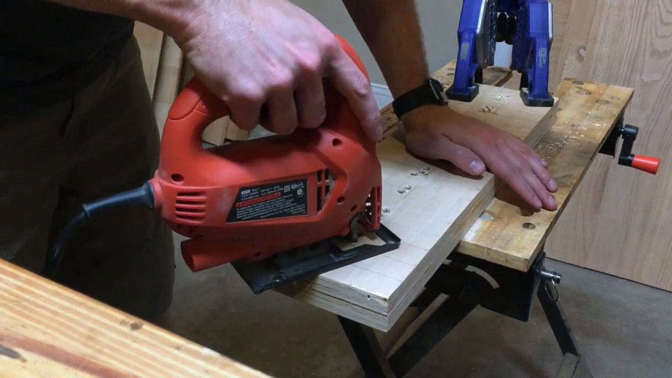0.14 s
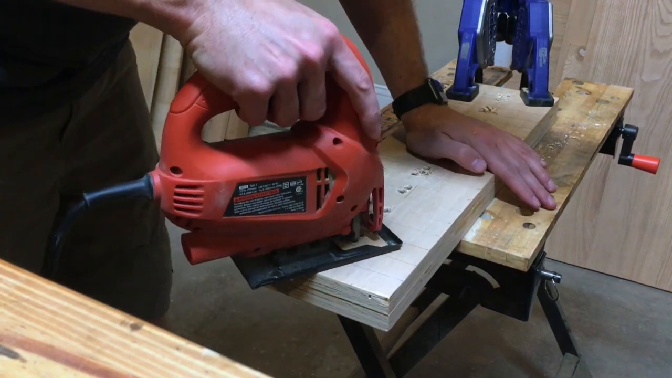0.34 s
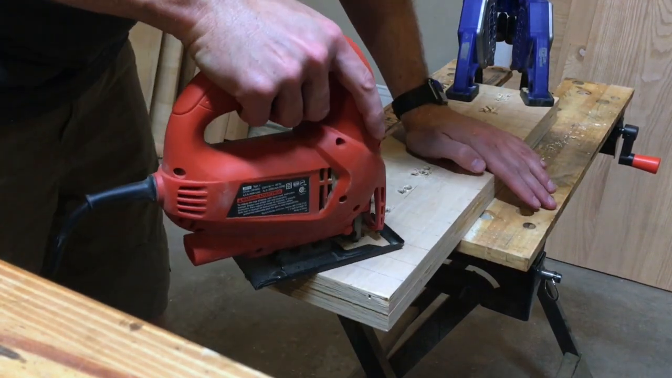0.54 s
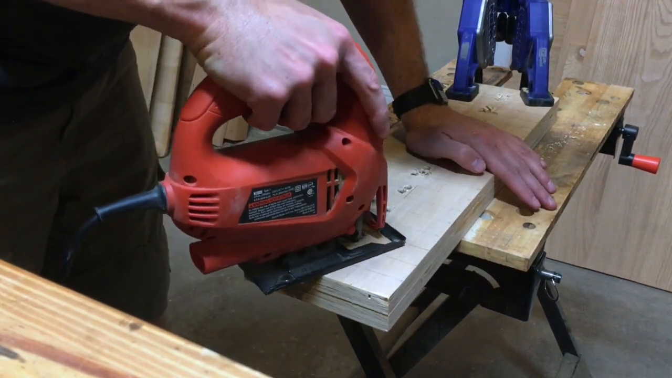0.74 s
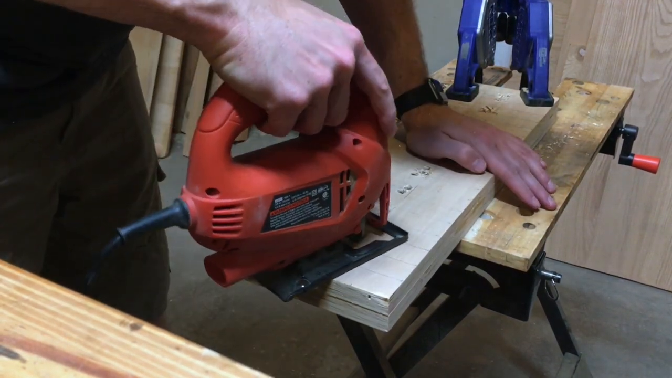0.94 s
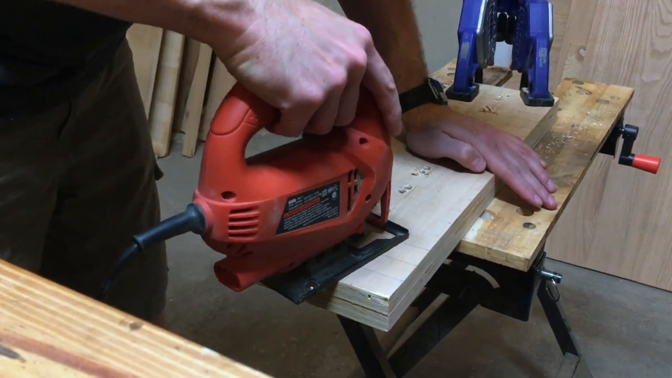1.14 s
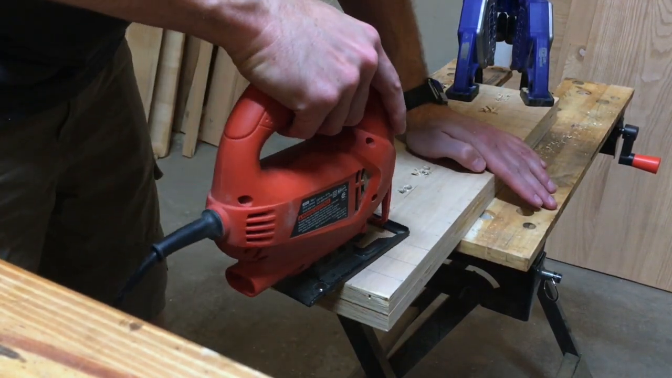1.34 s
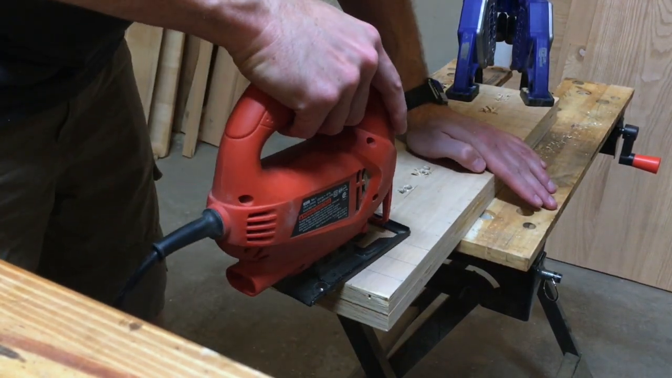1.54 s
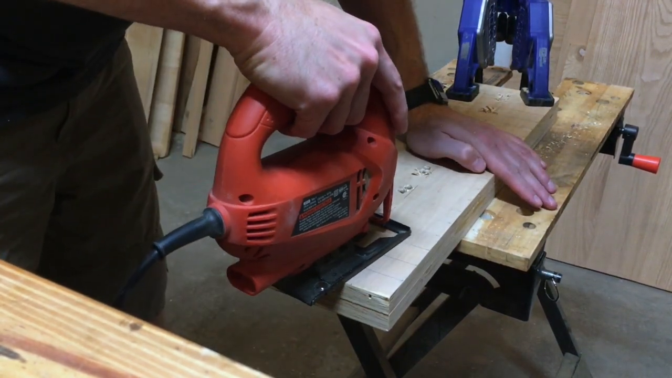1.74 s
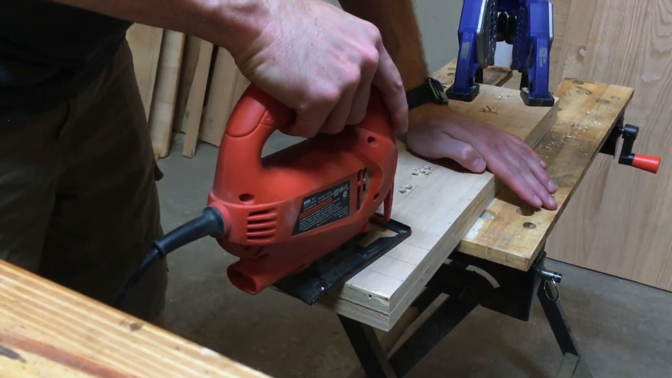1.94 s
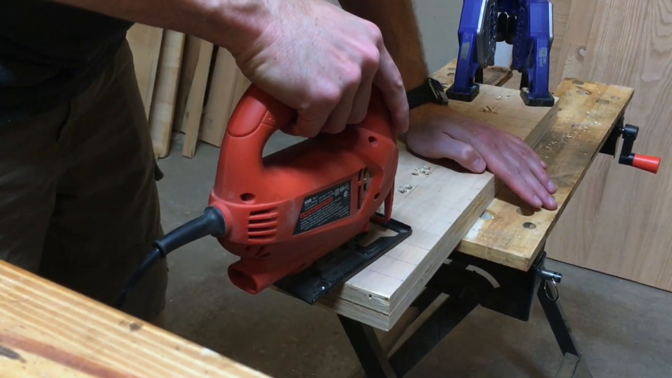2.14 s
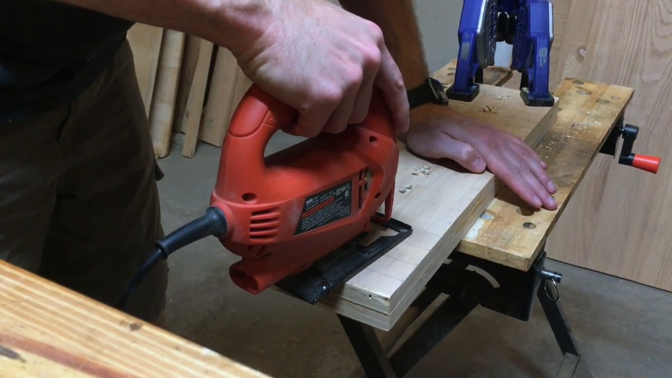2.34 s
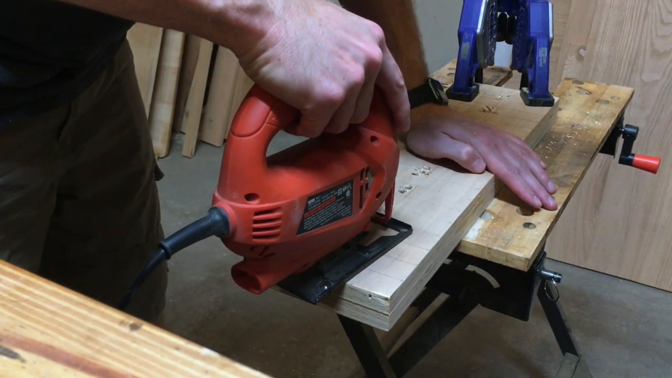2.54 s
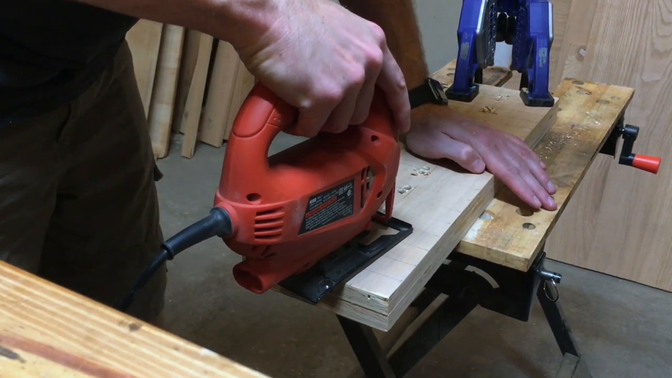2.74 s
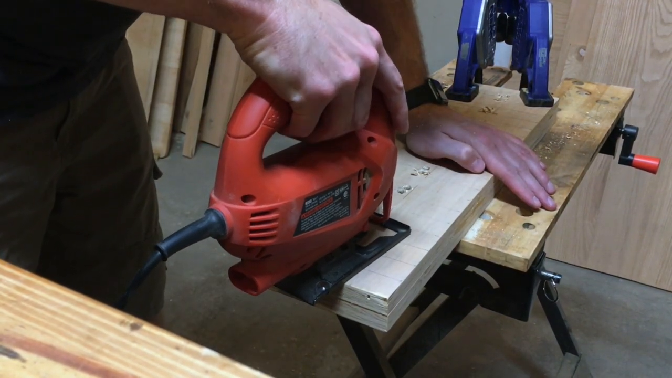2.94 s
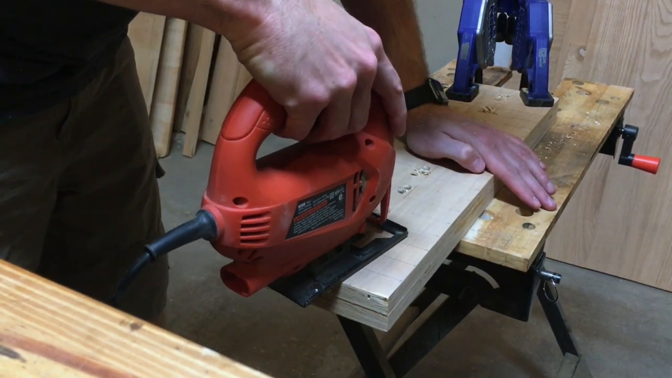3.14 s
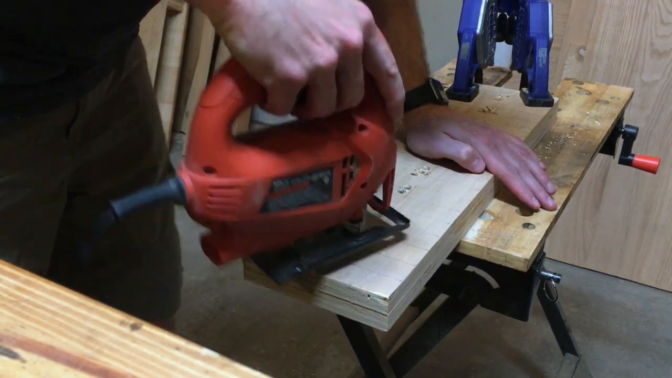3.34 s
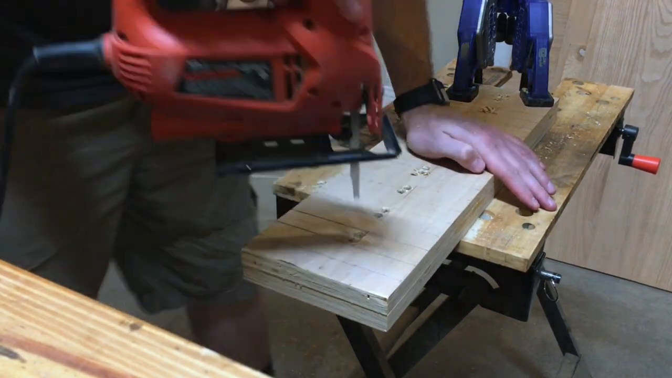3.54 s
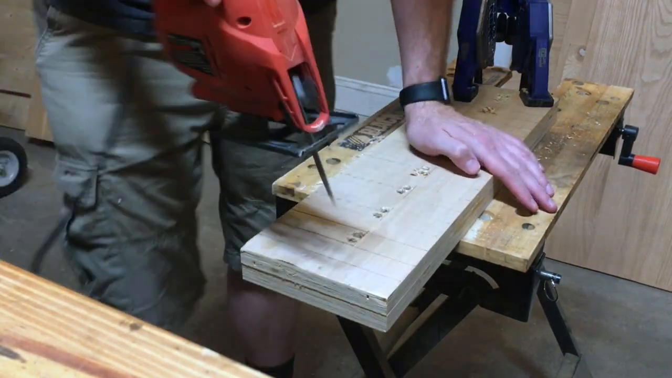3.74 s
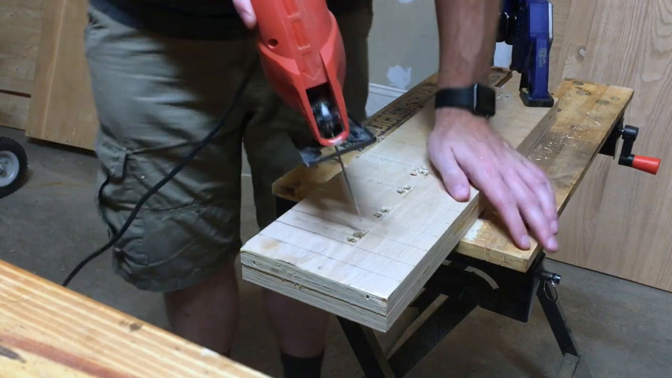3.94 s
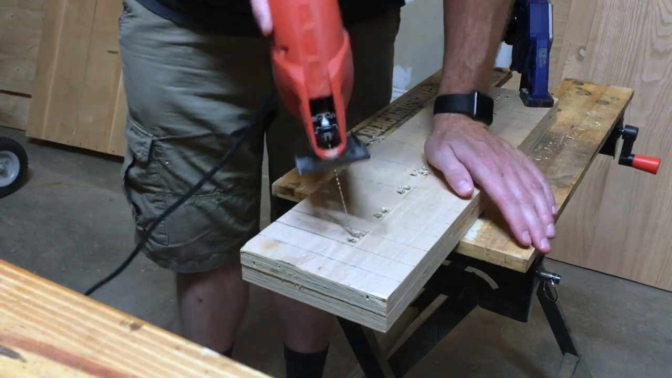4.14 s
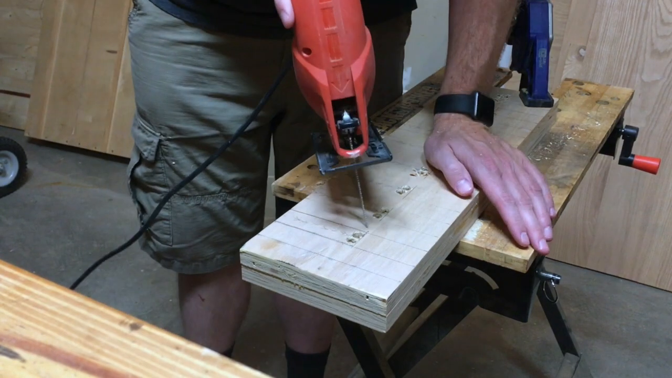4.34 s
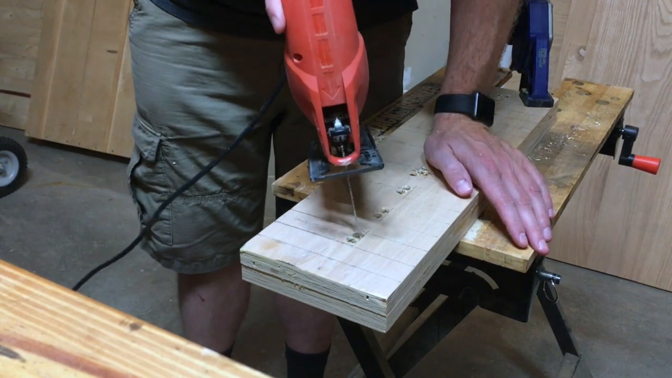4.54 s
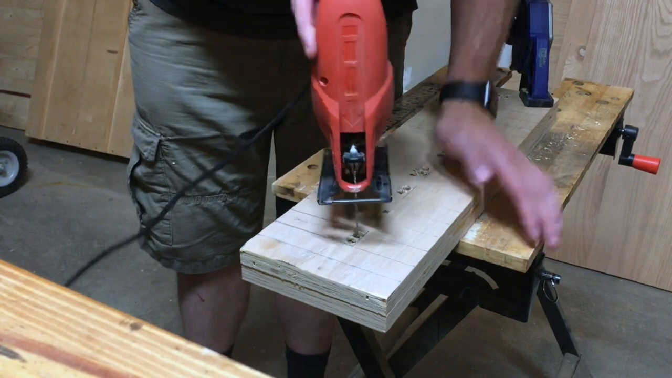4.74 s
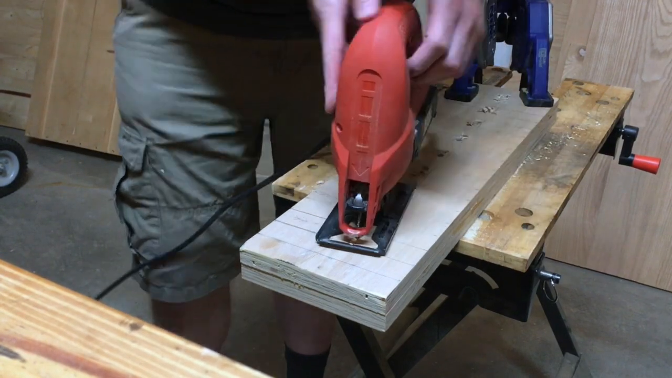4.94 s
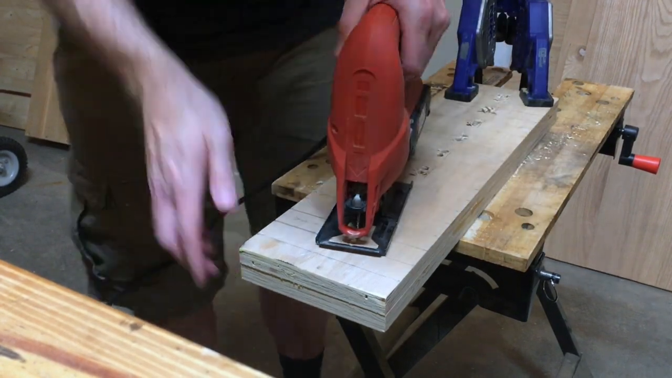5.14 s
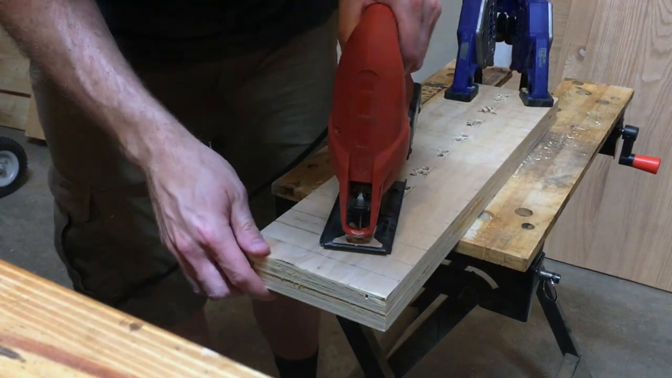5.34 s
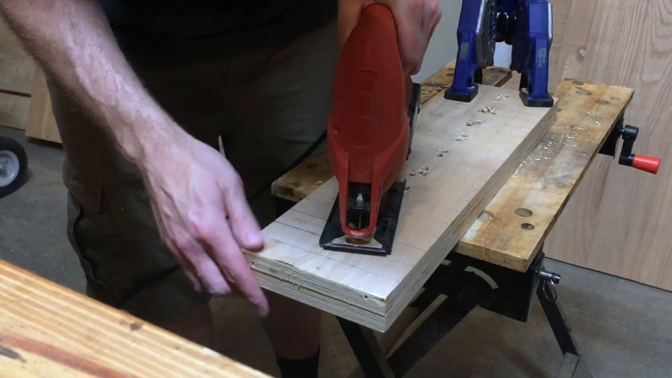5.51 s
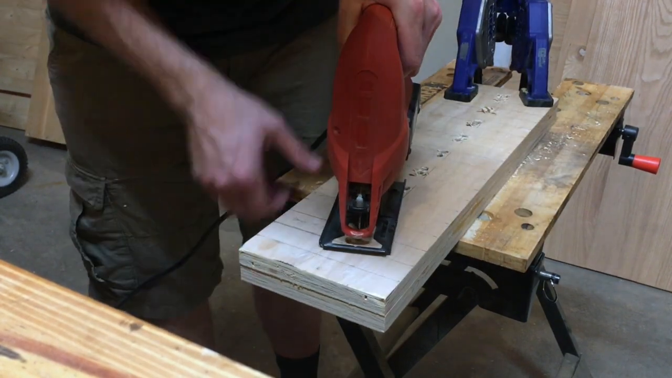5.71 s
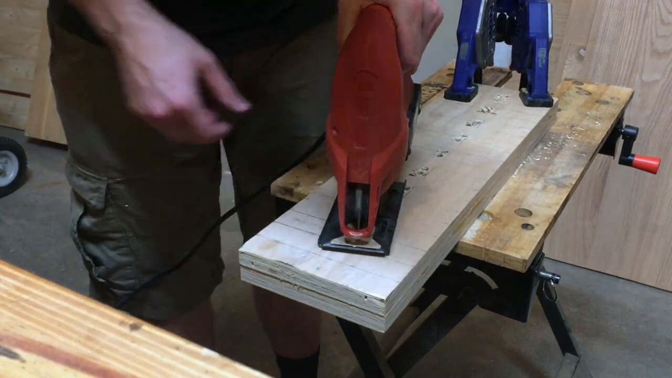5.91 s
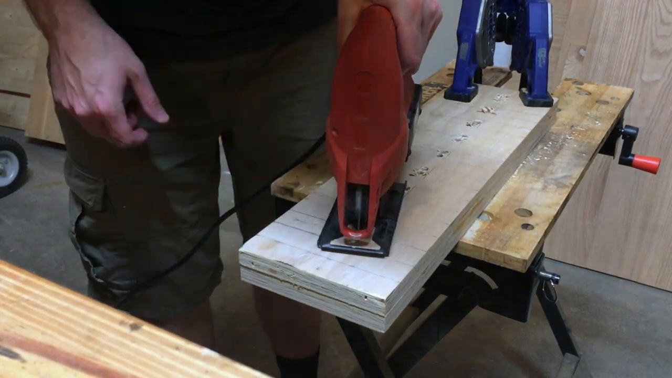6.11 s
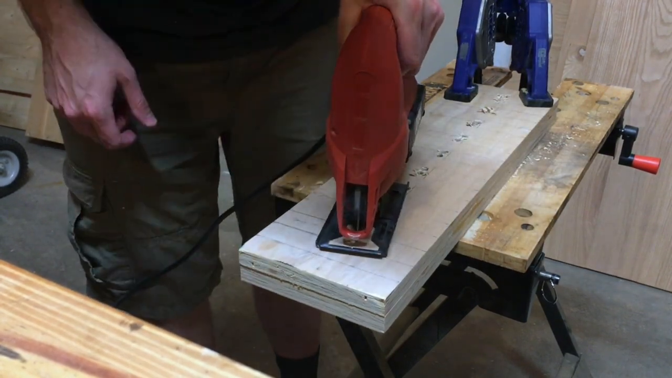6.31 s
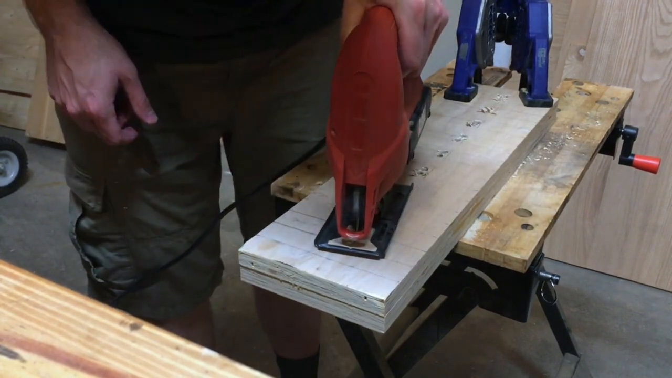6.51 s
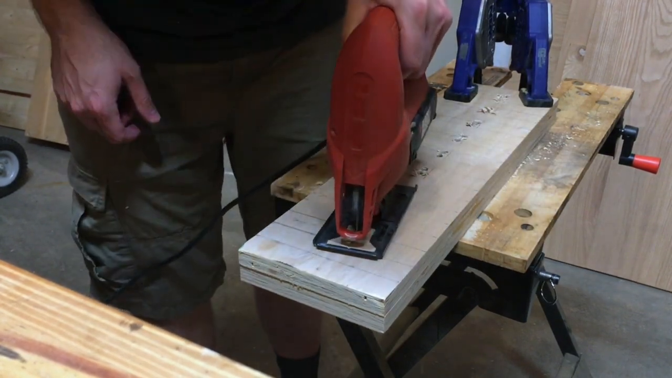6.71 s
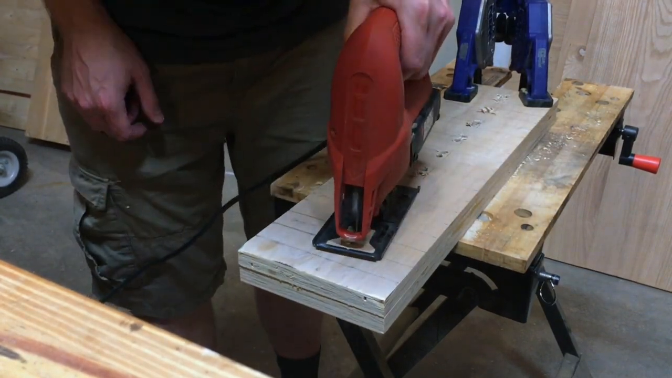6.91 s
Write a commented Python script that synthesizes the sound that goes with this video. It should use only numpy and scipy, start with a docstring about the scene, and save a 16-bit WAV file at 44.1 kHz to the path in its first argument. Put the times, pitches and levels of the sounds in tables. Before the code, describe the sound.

A trigger click and small knock, then a corded jigsaw roars up at once, cutting thick plywood with a harsh rattling buzz and gear whine. Switched off, it winds down over more than a second, thumping against the board as the blade leaves. Clicks, a scrape and a knock follow as it is set down; after near quiet it restarts, running free. Close single microphone, small workshop.

```python
"""In a humming workshop, one microphone picks up soft friction noise and small ticks, then a corded jigsaw starts.
It cuts thick plywood: gear teeth rattle and whine, the crank drones through resonances, the fan rushes.
Released, it coasts down while thumps sound in the board, snags as the blade leaves, crawls and sticks.
It is knocked, dragged and set down on the board; after faint ticks it starts again, running free to the end.
Strikes are noise bursts, tones follow the gear angle, knocks ring modes; room reflections lie behind."""
import sys
import numpy as np
from scipy import signal
from scipy.fft import rfft, irfft, next_fast_len
from scipy.io import wavfile
from scipy.ndimage import uniform_filter1d

SR = 44100
rng = np.random.default_rng(int(sys.argv[2]) if len(sys.argv) > 2 else 0)


def file_out(sig):
    """Save sig as 16-bit WAV at sys.argv[1]."""
    # one column per channel
    cols = np.atleast_2d(sig).T
    # limit, then scale
    lim = np.clip(cols, -1, 1)
    pcm = np.round(lim * 32767).astype(np.int16)
    wavfile.write(sys.argv[1], SR, pcm)


N = 307361
HZ = np.maximum(np.fft.rfftfreq(next_fast_len(N + SR), 1 / SR), 1)   # frequency grid of all spectral filters

# Spectrum of the steady workshop floor: [f/Hz, relative level/dB per Hz]
AIR_COLOUR = [(20, -48.5), (59, -19), (89, -10), (130, 1.5), (216, -3.5), (542, -7.5), (1510, -28),
              (11700, -43), (15800, -46)]
AIR_DB = -72
# Low workshop hum: [t/s, level/dB]
HUM_LEVEL = [(0, -80), (3.7, -80), (4.2, -71), (6.97, -75)]
HUM_HZ, HUM_WIDTH_HZ = 113, 16
ROOM_DB = -8   # reflections against the direct sound
ROOM_T60_S, ROOM_TREBLE_T60_S, ROOM_DULL_HZ = 0.45, 0.27, 5000   # above ROOM_DULL_HZ they die sooner
CUTOFF_HZ = 16100   # nothing is left above this

# Friction noise dying away before the first run, and handling between the runs: [t/s, level/dB]
RUSTLE_LEVEL = [
    [(0.0, -64), (0.1, -78.5), (0.2, -83), (0.265, -95), (0.29, -78)],
    [(4.62, -102), (4.68, -82), (4.8, -83), (4.87, -66.5), (5.1, -70.5), (5.2, -81.5), (5.45, -91),
     (5.6, -89), (5.8, -87.5)],
]
# Spectrum of that friction: [f/Hz, relative level/dB per Hz]
RUSTLE_COLOUR = [(470, -19), (800, -13), (1440, -13.5), (1890, -8.5), (3400, -7), (15800, -19.5)]
# Ringing while the shoe drags over the board: [f/Hz, width/Hz, lift/dB]
DRAG_PEAK = [(3500, 320, 9)]
DRAG_FROM_S, DRAG_TO_S = 4.65, 4.92
# Blows on the board: [t/s, strength/dB, brightness/dB per octave]
THUMPS = [(0.34, -53, 9), (0.359, -48, 9.5), (3.324, -52, 6), (3.365, -50.5, -2), (3.39, -54, 5),
          (3.424, -53, -6), (3.462, -51, 6), (3.546, -43, 7.5), (3.6, -67, 10), (4.204, -47.5, 5),
          (4.885, -55, 1), (4.919, -41.5, 7), (4.942, -57, -5), (4.964, -62, 1)]
# Modes of the board: [f/Hz, relative level/dB, t60/s]
BOARD_MODES = [(215, -1, .09), (240, 0, .09), (275, 0, .08), (330, -1, .05), (420, -6, .04), (690, -9, .04),
               (900, -12, .03), (1152, -14, .03), (1410, -13, .03)]
JUDDER_T60_S, JUDDER_SHARE = 0.26, 0.72   # each blow judders on
# Dry ticks of trigger, shoe and blade: [t/s, strength/dB, treble snap above it/dB]
TICKS = [(0.2064, -71, -13), (0.2628, -59, 8), (0.299, -62, -4), (0.315, -41, -6), (0.356, -32, -10),
         (4.1338, -40, -9), (4.1475, -46, -5), (4.157, -42, -4), (4.203, -39, -9), (4.21, -35, -4),
         (4.319, -47.5, -10), (4.361, -48, -12), (4.699, -64, -2.5), (4.7484, -59, -8), (4.7544, -57.5, -4),
         (4.8738, -67, 3), (4.898, -51.5, 13), (4.911, -48, 8), (4.9167, -35.5, -10), (5.3522, -71, -3),
         (5.687, -64.5, -7), (5.817, -68, 1), (5.861, -63, 0)]
# Spectrum of crack and tail: [f/Hz, relative level/dB per Hz]
TICK_COLOUR = [(530, -8.5), (1500, -6), (4710, 3), (5630, -8), (8890, -5), (15800, -20.5)]
# Modes of the metal shoe that the ticks excite: [f/Hz, relative level/dB]
SHOE_MODES = [(3460, 1.5), (4400, -6), (6200, -1.5), (7690, -5.5), (8820, -10.5)]
SHOE_T60_S = 0.022
SNAP_FROM_HZ = 5000

# Trigger of the saw, one row for each run: [pulled t/s, released t/s]
TRIGGER = [(0.285, 2.87), (5.849, 7.5)]
# Load, mostly the feed into the wood, slows the gear: [t/s, speed lost/turns per s]
FEED = [(0.55, 2.5), (0.8, 3.8), (0.95, 4.9), (1.15, 5.1), (1.25, 3.6), (1.38, 2.0), (1.8, 2.8), (2.3, 4.7),
        (2.7, 5.0), (2.87, 2.8), (6.15, 0.8), (6.27, 1.0), (6.5, 0)]
FREE_TURNS_PER_S = 97.8   # gear speed without load
SQUEEZE_S, SPIN_UP_S = 0.016, 0.13   # soft closing of the trigger, time constant of the pull-up
COAST_S, FRICTION_TURNS_PER_S = 1.0, 15.0   # drag time constant, and dry friction that brings it to rest
SNAG_S, SNAG_TAKES_S, SNAG_TURNS_PER_S = 3.33, 0.12, 1.4   # the blade binds on its way out and brakes the gear
STICK_S, STICK_TAKES_S = 4.36, 0.12   # the crawling gear sticks and stops
TEETH, PINION_TEETH = 46, 5
LOOSE_BELOW, LOOSE_OVER = 80, 28   # turns per s under which the gear loosens, and over how many

# Low crank lines: [gear order, relative level in the wood/dB, relative level running free/dB]
CRANK = [(2, -79, -72.5), (3, -68.5, -73.5), (4, -70.5, -68.5), (5, -69, -58.5), (7, -67.5, -65),
         (8, -74, -60.5)]
# Armature lines, harmonics 1 and 2: [relative level in the wood/dB, relative level running free/dB]
ARMATURE = [(-60, -56), (-60, -64)]
# Resonances of board and room that the drone passes: [f/Hz, width/Hz, lift/dB]
BOOM = [(277.6, 8, 11.5), (340, 17, 9), (383.6, 29, 14), (428, 21, 12.5), (484, 7.2, 6), (600, 10, 4),
        (675, 16, 19.5)]
FREE_FROM_S = 5   # from here the drone takes its running-free levels

# Uneven crank load gives the whine side lines: [gear orders from the whine, relative level/dB]
WHINE_SIDES = [(-2, -6.5), (0, -3), (2, -8)]
# The same around its octave: [gear orders from the octave, relative level/dB]
OCTAVE_SIDES = [(-2, -3.5), (-0.13, 4.5), (1, -6)]
# Overtones of the loose gear: [multiple of the tooth rate, relative level/dB]
OVERTONES = [(3, -69)]
# Casing resonances and a dip that the whine passes: [f/Hz, width/Hz, lift/dB]
WHINE_PEAKS = [(2730, 330, 8), (3280, 570, -13), (3780, 680, 5), (4690, 250, 3), (6410, 820, 20)]
# Whine through the runs: [t/s, whine above its law/dB, octave above its law/dB]
WHINE_COURSE = [(0.37, -9, 0), (0.425, 4, 1), (0.5, -10, 0), (0.72, 0, 13), (0.85, 4, 15), (1.05, 2, 13),
                (1.25, -2, 0), (1.45, 3, 4), (2.0, 1, 6), (2.5, 3, 5), (2.7, 0, 3), (2.9, 3, 0),
                (3.06, -3, -9), (3.33, -3, -8), (3.4, 3, 8), (3.48, -9, 3), (5.97, -12, -10), (6.09, -1, 0),
                (6.6, -1, 0)]
# Law: relative level at full speed, and rise per octave of speed
WHINE_DB, WHINE_DB_PER_OCTAVE = -48.5, 4.0
OCTAVE_DB, OCTAVE_DB_PER_OCTAVE = -63.0, 2.5

# Spectrum of rattle and rush: [f/Hz, relative level/dB per Hz]
RATTLE_COLOUR = [(60, -38), (226, -22.5), (450, -11.5), (700, -6), (1000, -8.5), (2000, -5), (4260, 1.5),
                 (5400, -1), (7500, -1), (13500, -5.5), (15800, -8)]
# Resonances and a dip of the housing: [f/Hz, width/Hz, lift/dB]
HOUSING = [(1318, 170, 6), (1934, 200, 4.5), (2516, 410, 3), (6430, 1000, 4.5), (9960, 620, -4.5)]
# Casing rung by the unloaded, loose gear train: [f/Hz, width/Hz, lift/dB]
LOOSE_RING = [(3810, 130, 9), (4570, 1000, 6)]
# Rattle against speed: [gear speed/turns per s, relative level/dB, bass above it/dB, treble above it/dB]
BY_SPEED = [(1.19, -84, -2, -20), (9.8, -67.5, -1, -46), (15, -59.5, -5, -14), (17.5, -53.5, -11.5, -16),
            (25.6, -47.5, -9.5, -11.5), (34.4, -45, -3.5, -9.5), (47.6, -42, -5.5, -3.5),
            (87.5, -38.5, -0.5, -3), (101.5, -37.5, -3.5, -4)]
WOOD_DB, WOOD_BASS_DB, WOOD_TREBLE_DB = -1.2, 2, 3   # added while the blade is in the cut
OUT_OF_CUT_S, WITHDRAW_S = 3.58, 0.25   # moment the blade is out, and how long it takes to leave


def amp(db):
    """dB to gain."""
    return 10 ** (np.asarray(db) / 20)


def rms_one(x):
    """Scale to rms 1."""
    return x / np.sqrt(np.mean(x ** 2) + 1e-20)


def in_time(rows, silent=None):
    """Each column as a curve over all samples; silent is its value outside the rows."""
    s, *columns = np.transpose(rows)
    after = silent if s[-1] < N / SR - .05 else None
    return [np.interp(np.arange(N) / SR, s, column, silent, after) for column in columns]


def shaped(x, gain):
    """Filter by a gain given at every HZ."""
    return irfft(rfft(x, 2 * len(HZ) - 2) * gain)[:N]


def curve_gain(points):
    """Gain of a spectrum table, interpolated over log frequency."""
    hz, db = np.transpose(points)
    return amp(np.interp(np.log(HZ), np.log(hz), db))


def lift(peaks, hz):
    """Gain of bell-shaped resonances at hz."""
    return amp(sum(db / (1 + (2 * (hz - centre) / width) ** 2) for centre, width, db in peaks))


def drift(rate_hz):
    """Slow random wander of rms 1, low-passed at rate_hz."""
    knots = rng.standard_normal(N // 200 + 2)   # one every 200 samples
    sos = signal.butter(2, min(rate_hz * 400 / SR, .9), output="sos")
    return np.interp(np.arange(N) / 200, np.arange(len(knots)), rms_one(signal.sosfiltfilt(sos, knots)))


def ring(clicks, hz, t60):
    """Two-pole resonator: a unit click sets a decaying sine of height 1 ringing."""
    r, w = amp(-60 / (t60 * SR)), 2 * np.pi * hz / SR
    return signal.lfilter([0, np.sin(w)], [1, -2 * r * np.cos(w), r * r], clicks + 1e-18)


def workshop_air():
    """A dull steady floor of noise, and narrow-band noise as a low hum that wavers."""
    air = rms_one(shaped(rng.standard_normal(N), curve_gain(AIR_COLOUR)))
    hum_gain = 1 / (1 + (2 * (HZ - HUM_HZ) / HUM_WIDTH_HZ) ** 2)
    hum = rms_one(shaped(rng.standard_normal(N), hum_gain))
    return amp(AIR_DB) * air + amp(in_time(HUM_LEVEL)[0]) * hum


def room(x):
    """Dense reflections dying away, the treble first, from 5 ms after the direct sound."""
    t, white = np.arange(SR // 2) / SR, rng.standard_normal(SR // 2)
    dull = signal.sosfilt(signal.butter(1, ROOM_DULL_HZ, fs=SR, output="sos"), white)
    tail = dull * amp(-60 * t / ROOM_T60_S) + (white - dull) * amp(-60 * t / ROOM_TREBLE_T60_S)
    tail = tail * (t > .005)
    return x + amp(ROOM_DB) * signal.fftconvolve(x, tail / np.sqrt(np.sum(tail ** 2)))[:N]


def rustle():
    """Soft friction noise following the spells' levels, ringing while the shoe drags."""
    t, white, colour = np.arange(N) / SR, rng.standard_normal(N), curve_gain(RUSTLE_COLOUR)
    plain = shaped(white, colour)
    drag = shaped(white, colour * lift(DRAG_PEAK, HZ))
    dragging = (t > DRAG_FROM_S) & (t < DRAG_TO_S)
    noise = np.where(dragging, drag, plain) / np.std(plain)
    return noise * sum(amp(in_time(spell, -150)[0]) for spell in RUSTLE_LEVEL)


def thumps():
    """Each blow gives every mode of the board a strength of its own; bright blows favour the upper ones."""
    s, blow_db, bright_db = np.transpose(THUMPS)
    at, out = np.round(s * SR).astype(int), np.zeros(N)
    luck_db = rng.normal(0, 2, (len(s), len(BOARD_MODES)))
    for k, (hz, db, t60) in enumerate(BOARD_MODES):
        clicks = np.zeros(N)
        clicks[at] = amp(blow_db + db + bright_db * np.log2(hz / 300) + luck_db[:, k]) * (-1) ** k
        # the energy of the judder falls 60 dB in its t60
        energy = signal.lfilter([1], [1, -amp(-120 / (JUDDER_T60_S * SR))], clicks ** 2 + 1e-30)
        judder = np.sqrt(energy) * rng.standard_normal(N) / np.sqrt(JUDDER_T60_S * SR / 14)
        clicks = clicks + JUDDER_SHARE * judder
        clicks = uniform_filter1d(clicks, size=16, origin=-8)   # a soft contact
        out += ring(clicks, hz, t60)
    # a small board radiates no deep bass
    return signal.sosfilt(signal.butter(2, 110, "high", fs=SR, output="sos"), out)


def ticks(crack_s, ring_db, tail_db, tail_s):
    """A crack with a sharp treble snap sets the metal shoe ringing and leaves a faint noisy tail."""
    t = np.arange(N) / SR
    tail, crack, snap = np.zeros(N), np.zeros(N), np.zeros(N)   # energies
    for s, db, snap_db in TICKS:
        now = slice(round(s * SR), round((s + .3) * SR))
        since = t[now] - s
        crack[now] += amp(db - 60 * since / crack_s) ** 2
        snap[now] += amp(db + snap_db - 60 * since / crack_s) ** 2
        tail[now] += amp(db + tail_db - 60 * since / tail_s) ** 2
    colour = curve_gain(TICK_COLOUR)
    colour = colour / np.sqrt(np.mean(colour ** 2))
    out = shaped(np.sqrt(tail + crack) * rng.standard_normal(N), colour)
    out += shaped(np.sqrt(snap) * rng.standard_normal(N), 1 / (1 + (SNAP_FROM_HZ / HZ) ** 2))
    for hz, db in SHOE_MODES:
        hit = amp(ring_db + db) * np.sqrt(crack + snap) * rng.standard_normal(N)
        out = out + ring(hit, hz, SHOE_T60_S)
    return out


def gear():
    """Speed in turns per s: pull-up to the loaded speed, then coasting against drag and friction."""
    t = np.arange(N) / SR
    load = in_time(FEED)[0]
    speed = np.full(N, .5)   # a floor too slow to be heard
    for on, off in TRIGGER:
        since = SQUEEZE_S * np.logaddexp(0, (t - on) / SQUEEZE_S)
        driven = (FREE_TURNS_PER_S - load) * (1 - np.exp(-since / SPIN_UP_S))
        last = driven[min(round(off * SR), N) - 1]
        dragged = (last + FRICTION_TURNS_PER_S) * np.exp(-np.maximum(t - off, 0) / COAST_S)
        coasting = dragged - FRICTION_TURNS_PER_S
        coasting -= SNAG_TURNS_PER_S * np.clip((t - SNAG_S) / SNAG_TAKES_S, 0, 1)
        coasting *= np.clip(1 - (t - STICK_S) / STICK_TAKES_S, 0, 1)
        speed = np.maximum(speed, np.where(t < off, driven, coasting))
    return speed


def looseness(speed):
    """Unloaded teeth have play: 0 under drive or at speed, 1 when coasting slowly."""
    t = np.arange(N) / SR
    between_runs = (t > TRIGGER[0][1]) & (t < TRIGGER[1][0])
    return np.clip((LOOSE_BELOW - speed) / LOOSE_OVER, 0, 1) * between_runs


def drone(turns, speed, torque_db, free_torque_db, waver_db):
    """Low orders of crank and armature, changed in level by resonances and by the motor's pull-up."""
    free = np.arange(N) / SR > FREE_FROM_S
    pull = uniform_filter1d(np.clip(np.gradient(speed) * SR / 80, 0, 1), size=4000)
    lines = [(round(order), cut_db, free_db) for order, cut_db, free_db in CRANK]
    for k, (cut_db, free_db) in enumerate(ARMATURE, 1):
        lines.append((k * TEETH / PINION_TEETH, cut_db, free_db))
    out = 0
    for order, cut_db, free_db in lines:
        db = np.where(free, free_db, cut_db) + waver_db * drift(3.8)
        gain = amp(db) * lift(BOOM, order * speed)
        out = out + np.sqrt(2) * gain * np.sin(2 * np.pi * (order * turns + rng.random()))
    torque = amp(np.where(free, free_torque_db, torque_db) * pull)
    return out * torque * np.clip((speed - 30) / 65, 0, 2) ** 2   # fading fast as the gear slows


def whine(turns, speed, whine_db, octave_db, waver_db, blur, loose_db):
    """The tooth rate and its octave, with side lines that swell and fade; rough while the speed changes."""
    acceleration = np.abs(np.gradient(speed)) * SR / FREE_TURNS_PER_S
    unsteady = blur * np.sqrt(acceleration) * drift(36)
    loose = looseness(speed)
    out = 0
    for order, sides, level_db in (TEETH, WHINE_SIDES, whine_db), (2 * TEETH, OCTAVE_SIDES, octave_db):
        for step, db in sides:
            # fractional steps move only the resonance gain, not the pitch
            phase = 2 * np.pi * ((order + round(step)) * turns + rng.random()) + unsteady
            db = db + loose_db * abs(step) * loose   # side lines weaken on an unloaded crank
            gain = amp(level_db + db + waver_db * drift(19.0))
            gain = gain * lift(WHINE_PEAKS, (order + step) * speed)
            out = out + np.sqrt(2) * gain * np.sin(phase)
    for times, db in OVERTONES:
        order = times * TEETH
        gain = amp(db) * loose * lift(WHINE_PEAKS, order * speed)
        out = out + np.sqrt(2) * gain * np.sin(2 * np.pi * order * turns)
    return out * np.clip((speed - 20) / 10, 0, 1)   # silent when slow


def rattle(turns, speed, spread_db, strike_s, rush, throb, double_throb, slap, burst_db):
    """Every tooth strikes with a chance strength, sparser as the gear slows, over the rush of the fan."""
    strikes = np.diff(np.floor(TEETH * turns), prepend=0) > 0
    sizes = amp(spread_db * np.minimum(rng.exponential(1, N), 3))
    # each strike is a short noise burst; its level falls 30 dB in strike_s
    energy = signal.lfilter([1], [1, -amp(-60 / (strike_s * SR))], strikes * sizes ** 2)
    clicks = rms_one(rng.standard_normal(N) * np.sqrt(energy / np.maximum(speed, 8)))

    angle = 2 * np.pi * turns
    load = 1 + throb * np.cos(angle) + double_throb * np.cos(2 * angle)   # the crank's cycle
    loose = looseness(speed)
    slaps_db = slap * (np.cos(2 * angle) + np.cos(4 * angle))   # play at the stroke ends
    load = load * amp(loose * (slaps_db + burst_db * drift(30)))
    fan = rush * np.sqrt(speed / 95) * rng.standard_normal(N)
    source = load * (clicks + fan)
    source = source / np.sqrt(uniform_filter1d(source ** 2, size=8000))   # even out the slow level

    colour = curve_gain(RATTLE_COLOUR) * lift(HOUSING, HZ)
    bass = 1 / (1 + (HZ / 2500) ** 6)
    treble = 1 / (1 + (9500 / HZ) ** 12)
    middle = 1 - bass - treble + 1e-9
    low, mid, high = (rms_one(shaped(source, colour * np.sqrt(part))) for part in (bass, middle, treble))
    ringing = rms_one(shaped(mid, lift(LOOSE_RING, HZ)))
    mid = mid + loose * (ringing - mid)

    at, *columns = np.transpose(sorted(BY_SPEED))
    level_db, bass_db, treble_db = (np.interp(speed, at, column) for column in columns)
    wood = np.clip((OUT_OF_CUT_S - np.arange(N) / SR) / WITHDRAW_S, 0, 1)
    level = amp(level_db + WOOD_DB * wood) * (speed > 1)
    low = amp(bass_db + WOOD_BASS_DB * wood) * low
    high = amp(treble_db + WOOD_TREBLE_DB * wood) * high
    return level * (mid + low + high)


def scene():
    """Workshop, handling and saw as one microphone hears them, alike on both channels."""
    speed = gear()
    turns = np.cumsum(speed) / SR
    octaves = np.log2(speed / FREE_TURNS_PER_S)
    whine_course_db, octave_course_db = in_time(WHINE_COURSE)
    whine_db = WHINE_DB + whine_course_db + WHINE_DB_PER_OCTAVE * octaves
    octave_db = OCTAVE_DB + octave_course_db + OCTAVE_DB_PER_OCTAVE * octaves

    handling = ticks(crack_s=0.0077, ring_db=-26.0, tail_db=-9.0, tail_s=0.15) + thumps()
    tones = drone(turns, speed, torque_db=8.0, free_torque_db=-6.0, waver_db=1.6)
    tones = tones + whine(turns, speed, whine_db, octave_db, waver_db=2.6, blur=0.9, loose_db=-4)
    saw = rattle(turns, speed, spread_db=3.0, strike_s=0.0027, rush=0.69, throb=0.064,
                 double_throb=0.13, slap=0.66, burst_db=0.7)
    # the tones are heard mostly direct, with little of them in the room
    in_room = room(handling + amp(-3.0) * saw + amp(-22.0) * tones)
    mono = workshop_air() + rustle() + in_room + tones
    return np.array([mono, mono])


def record(dry):
    """A steep low-pass cuts the top."""
    return signal.sosfilt(signal.cheby2(16, 70, CUTOFF_HZ, fs=SR, output="sos"), dry)


dry = scene()
out = record(dry)
file_out(out)
```